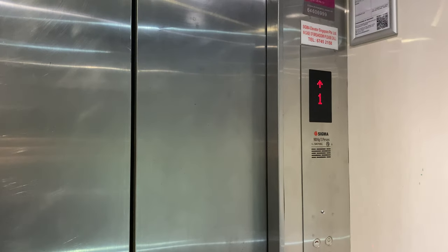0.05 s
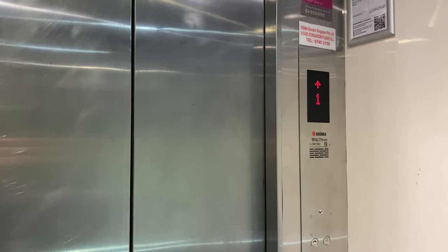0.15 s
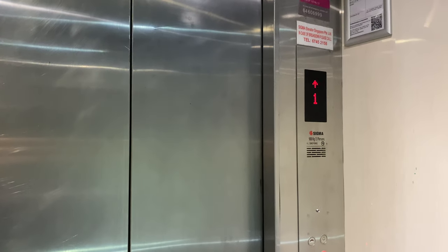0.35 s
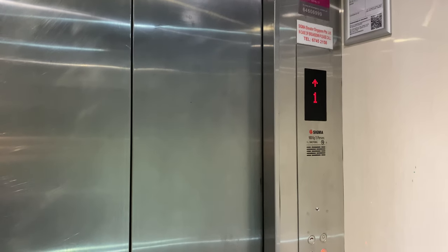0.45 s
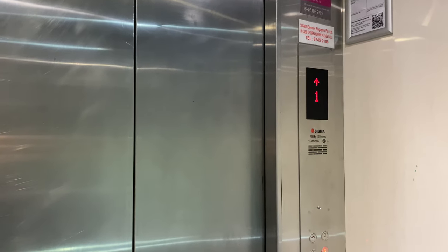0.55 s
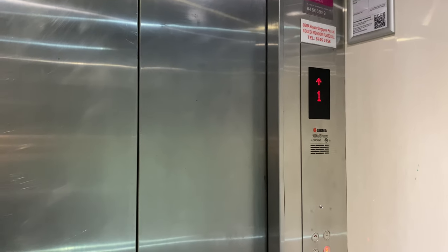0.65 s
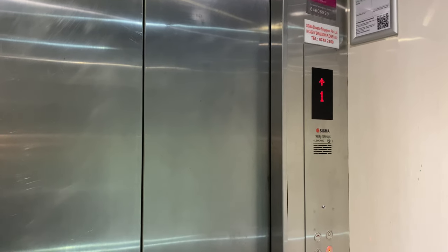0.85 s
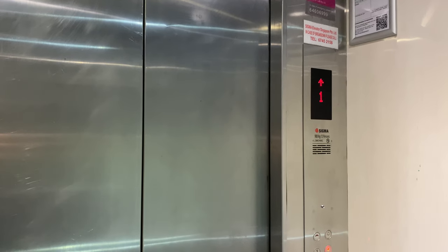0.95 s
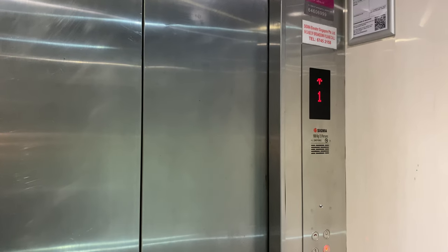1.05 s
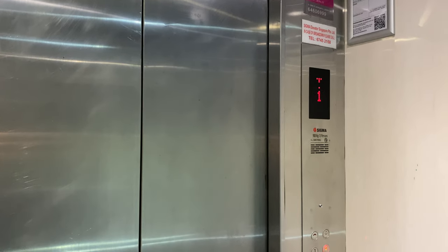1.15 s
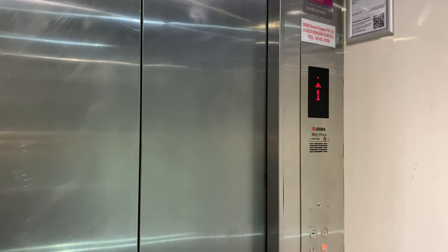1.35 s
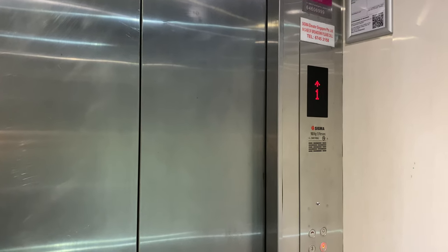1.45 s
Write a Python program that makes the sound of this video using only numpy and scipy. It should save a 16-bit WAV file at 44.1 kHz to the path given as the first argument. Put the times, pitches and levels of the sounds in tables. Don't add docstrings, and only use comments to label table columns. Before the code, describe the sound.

Metal lift doors close with a hard clunk and clang over low machinery hum; loose sheet metal rattles, the frame rings on, then a latch chatters and knocks lightly, heard close up in a small steel space.

```python
import sys
import numpy as np
from scipy import signal
from scipy.fft import rfft, irfft
from scipy.io import wavfile
from scipy.ndimage import uniform_filter1d

SR = 44100
rng = np.random.default_rng(int(sys.argv[2]) if len(sys.argv) > 2 else 0)


def unload_audio(sound):
    columns = np.transpose(np.atleast_2d(sound))
    steps = np.round(np.clip(columns, -1, 1) * 32767)
    wavfile.write(sys.argv[1], SR, steps.astype(np.int16))


def how_loud(loudness_db):
    steps = np.asarray(loudness_db, float) / 20
    return 10 ** steps


N = 66150

# pitch_hz, level_db (per Hz)
HUM_SPECTRUM = [(12, -51), (20, -12), (96, -1), (326, -19.5), (414, -21), (849, -19), (920, -27.5),
                (2530, -38.5), (11500, -60), (15000, -94), (22000, -120)]
# pitch_hz, width_hz, level_db (rms)
DUCT_RESONANCES = [(50.6, 8.3, -53.5), (125, 31, -48.5), (247, 15, -56.5), (382.6, 9.8, -56),
                   (638, 85, -61), (820, 130, -61), (1224, 320, -56.5), (2583, 110, -63.5)]
# time_s, level_db
MACHINE_LOAD = [(0, -2), (.2, -1), (.6, -1.5), (.9, 2.5), (1.0, -3.5), (1.15, -2.5), (1.3, -3.5), (1.5, -3)]
# time_s, centre_hz, level_db
DRIVE_PATH = [(0.901, 13600, -85), (1.03, 13600, -69), (1.151, 14400, -65.5), (1.28, 14200, -66.5),
              (1.4, 14200, -67), (1.5, 13900, -98)]
# start_s, level_db, hold_s, t60_s, tilt_db_per_octave
RATTLES = [(0.213, -39, 0.076, 0.25, 4.5), (0.268, -30.5, 0.05, 0.52, -0.5), (0.31, -59, 1, 2.7, 2.5),
           (0.508, -71.5, 0.025, 1.5, 14.5), (0.683, -38.5, 0.033, 0.11, -2.),
           (0.695, -48, 0.015, 0.57, 5.5), (0.737, -44.5, 0.04, 0.28, 0)]
# pitch_hz, level_db (per Hz)
RATTLE_SPECTRUM = [(590, -4.5), (1000, 2.5), (1240, -3), (2020, -7), (2110, -8), (3020, -12.5), (4010, -17),
                   (6290, -20), (11500, -45.5), (15000, -78), (22000, -120)]
# start_s, level_db, hold_s, t60_s
BANGS = [
    (0.232, -39, 0.05, .2),
    (0.27, -23, 0.1, 0.19),
    (0.402, -30, 0.0081, 0.81),
    (0.694, -37.5, 0.061, 0.27),
]
# pitch_hz, level_db (per Hz)
BANG_SPECTRUM = [(100, 1), (170, -10), (242, -13.5), (318, -3.5), (462, -2), (540, -7), (774, -14),
                 (863, 2.5), (1100, -42), (1430, -47), (2420, -120)]
# start_s, level_db
TICKS = [
    (.128, -35),
    (.4285, -16),
]
# start_s, level_db, contact_ms
WALL_THUDS = [(.224, -28.5, 0.67), (.259, -18, 2.4), (.300, -51, 6), (.345, -22.5, 0.72), (.402, -20, 0.68),
              (.462, -20, 6), (.555, -27.5, 2.8), (.63, -30, 0.67), (1.2, -35, 0.74)]
# pitch_hz, level_db, t60_s
WALL_MODES = [(26.4, -25, 1.6), (71, -38, 0.91), (86.2, 1.5, 0.46), (102.45, -3.5, 0.6), (142, -9, 0.4)]
# start_s, level_db, contact_ms
FRAME_BLOWS = [(.280, -33, .1)]
# pitch_hz, level_db, t60_s
FRAME_MODES = [(869, -4, 3.0), (870.8, -4, 1.1)]
# start_s, level_db, contact_ms
LATCH_BLOWS = [(.686, -40, 0.11), (.693, -44, 0.043), (.705, -40.5, 0.041), (.728, -43.5, 0.048)]
# pitch_hz, level_db, t60_s
LATCH_MODES = [(762, -4, 0.19), (1040, -12, 0.19), (1157, 0.5, .15), (1250, -1, 0.13), (1344, 3, 0.095),
               (1430, -2, 0.085), (1694, -1, 0.056), (1880, -14, 0.085)]
# start_s, level_db, contact_ms
LOCK_BLOWS = [(.7035, -25, 1.5), (.7115, -23, 1.3), (.727, -25, 1.2), (.744, -29.5, 0.93)]
# pitch_hz, level_db, t60_s
LOCK_MODES = [(55.6, -4, 0.21), (80, -11, 0.44), (129.6, 0.5, 0.2), (247, -23.5, 0.45), (424, -15, 0.15)]
# start_s, level_db, contact_ms
EDGE_BLOWS = [
    (.2245, -41, 0.95),
    (.2695, -19.5, 0.1),
]
# pitch_hz, level_db, t60_s
EDGE_MODES = [(274, -4, 0.11), (489, -4, .2), (570, -16, 0.043), (720, -1.5, 0.11), (1070, -10, 0.035)]
# start_s, level_db, contact_ms
SKIN_BLOWS = [(.276, -20.5, 0.11), (.290, -16.5, 0.11), (.311, -18, 0.31), (.338, -27.5, 0.091)]
# pitch_hz, level_db, t60_s
SKIN_MODES = [(870, -0.5, 0.19), (902, -3, 0.25), (904, -15, 0.31)]
# start_s, level_db, contact_ms
PANEL_BLOWS = [(.274, -22, 0.44), (.281, -24.5, 0.42), (.289, -25.5, 0.39), (.308, -26.5, 0.33),
               (.330, -26.5, 0.71), (.348, -46, 1.9), (.362, -33.5, 2.4), (.402, -35.5, 1.4)]
PANEL_HZ = [235, 261, 338, 386, 455, 485, 546, 583, 657, 737]
# level_db, t60_s
PANEL_RINGS = [(-6.5, 0.47), (-3.5, 0.753), (-5.5, 0.36), (-0.5, 0.23), (-1.5, 0.26), (-1.5, 0.66),
               (-5.5, 0.75), (-6, 0.28), (-12, 0.11), (-12, 0.11)]

HUM_DB, SWELL_DB, FLICKER_DB = -39.5, 0.7, 1.5
LOAD_HZ = 200
DRIVE_WIDTH_HZ = 900
AIR_HZ, AIR_WIDTH_HZ, AIR_DB, AIR_RATTLE_DB = 12900, 6600, -80.5, -33.5
RATTLE_ATTACK_S, RATTLE_GRAIN_DB = 0.003, 0.5
TICK_HZ, TICK_S = 2600, 0.00006
CAR_T60_S, CAR_DB = 0.14, -9.5
DOOR_PAN_DB = 3.5
WIDE_HZ, WIDE_SLOPE = 1290, 0.48
NOTCH_HZ, NOTCH_WIDTH_HZ, NOTCH_DB = 12120, 490, -44
PORT_LOW_HZ, PORT_TOP_HZ = 22.5, 15350
T = np.arange(N) / SR
F = np.maximum(np.fft.rfftfreq(N, 1 / SR), 1)


def unit(x):
    return x / np.sqrt(np.mean(x ** 2))


def shape(x, db):
    return irfft(rfft(x) * how_loud(db), N)


def spectrum(points):
    hz, db = np.array(points).T
    return np.interp(np.log(F), np.log(hz), db)


def bump(hz, width_hz):
    return -20 * np.log10(1 + (2 * (F - hz) / width_hz) ** 2)


def wide(hz):
    return np.minimum(hz / WIDE_HZ, 1) ** WIDE_SLOPE


def noise():
    mid, side = rng.standard_normal((2, N))
    side = irfft(rfft(side) * wide(F), N)
    return np.array([mid + side, mid - side])


def walk(rate_hz):
    hold = int(SR / rate_hz)
    steps = np.repeat(rng.standard_normal(N // hold + 1), hold)
    return 2.36 * uniform_filter1d(uniform_filter1d(steps, hold), hold)[:N]


def envelope(start_s, level_db, hold_s, t60_s):
    t = np.maximum(T - start_s, 0)
    release_db = 60 * np.maximum(t - hold_s, 0) / t60_s
    return np.minimum(t / RATTLE_ATTACK_S, 1) * how_loud(level_db - release_db)


def struck(blows, modes, scatter_db, spin):
    out = np.zeros((2, N))
    apart = rng.uniform(-0.039, 1, len(modes))
    luck = rng.standard_normal((len(blows), len(modes), 2))
    fade = np.arange(1024) / SR
    sides = np.array([[1], [-1]])
    for k, (hz, db, t60_s) in enumerate(modes):
        push = np.zeros(N + 1024, complex)
        for (start_s, level_db, contact_ms), (size, turn) in zip(blows, luck[:, k]):
            blow = np.exp(-fade * 1000 / max(contact_ms, .03))
            gain = how_loud(level_db + db + scatter_db * size) * np.exp(1j * spin * turn)
            i = int(start_s * SR)
            push[i:i + 1024] += blow / blow.sum() * gain
        pole = np.exp(2j * np.pi * hz / SR - np.log(1000) / (t60_s * SR))
        ring = signal.lfilter([1], [1, -pole], push[:N])
        out += (ring * np.exp(1j * wide(hz) * apart[k] * sides)).imag
    return out


def thin_air(sound):
    return unit(shape(sound, bump(AIR_HZ, AIR_WIDTH_HZ)))


def hum():
    bands, duct = 0, 0
    swell = SWELL_DB * walk(0.53)
    load = np.interp(T, *np.array(MACHINE_LOAD).T)
    for hz in 30 * 2. ** np.arange(9):
        band = shape(noise(), spectrum(HUM_SPECTRUM) - 12 * np.log2(F / hz) ** 2)
        bands = bands + band * how_loud(swell + FLICKER_DB * walk(8.39) + load / (1 + hz / LOAD_HZ))
    for hz, width_hz, db in DUCT_RESONANCES:
        level_db = db + FLICKER_DB * walk(12.2) + load / (1 + hz / LOAD_HZ)
        duct = duct + how_loud(level_db) * unit(shape(noise(), bump(hz, width_hz)))
    return how_loud(HUM_DB) * unit(bands) + duct + how_loud(AIR_DB) * thin_air(noise())


def drive():
    time_s, centre_hz, level_db = np.array(DRIVE_PATH).T
    slow = unit(shape(rng.standard_normal((2, N)), bump(0, DRIVE_WIDTH_HZ)))
    carrier = np.sin(2 * np.pi * np.cumsum(np.interp(T, time_s, centre_hz)) / SR)
    return slow * carrier * how_loud(np.interp(T, time_s, level_db))


def walls():
    return struck(WALL_THUDS, WALL_MODES, 0.87, 0.42)


def rattles():
    grains = noise() * how_loud(RATTLE_GRAIN_DB * walk(700))
    air = thin_air(grains)
    out = 0
    for start_s, level_db, hold_s, t60_s, tilt in RATTLES:
        body = unit(shape(grains, spectrum(RATTLE_SPECTRUM) + tilt * np.log2(F / 2000)))
        metal = body + how_loud(AIR_RATTLE_DB + 2.5 * tilt) * air
        out = out + envelope(start_s, level_db, hold_s, t60_s) * metal
    return out


def bangs():
    return sum(envelope(*row) for row in BANGS) * unit(shape(noise(), spectrum(BANG_SPECTRUM)))


def ticks():
    out = 0
    for start_s, level_db in TICKS:
        t = np.maximum(T - start_s, 0)
        out = out + how_loud(level_db) * np.sin(2 * np.pi * TICK_HZ * t) * np.exp(-t / TICK_S)
    return out


def latch():
    return struck(LATCH_BLOWS, LATCH_MODES, 3.7, 2.27)


def lock():
    return struck(LOCK_BLOWS, LOCK_MODES, 0.95, 0.097)


def frame():
    return struck(FRAME_BLOWS, FRAME_MODES, 0, 0)


def doors():
    panel_modes = [(hz, *ring) for hz, ring in zip(PANEL_HZ, PANEL_RINGS)]
    panels = struck(PANEL_BLOWS, panel_modes, 2.5, 1.5)
    edges = struck(EDGE_BLOWS, EDGE_MODES, 0.84, 0.58)
    skin = struck(SKIN_BLOWS, SKIN_MODES, 0.79, 0.14)
    return panels + edges + skin


def car_echo(sound):
    tail = noise()[:, :SR // 2] * how_loud(-60 * T[:SR // 2] / CAR_T60_S)
    tail = tail / np.sqrt((tail ** 2).sum(axis=1, keepdims=True))
    return signal.fftconvolve(sound, tail, axes=1)[:, :N]


def scene():
    sharp = doors() + latch() + lock()
    echo = how_loud(CAR_DB) * car_echo(sharp)
    direct = sharp * how_loud(np.array([[.5], [-.5]]) * DOOR_PAN_DB)
    return hum() + drive() + walls() + rattles() + bangs() + ticks() + frame() + echo + direct


def low_pass(x):
    return signal.sosfilt(signal.butter(12, 15810, fs=SR, output="sos"), x)


def record(dry):
    hz = np.maximum(np.fft.rfftfreq(2 * N, 1 / SR), 1)
    notch = NOTCH_DB * np.exp(-((hz - NOTCH_HZ) / NOTCH_WIDTH_HZ) ** 2)
    low_cut = -10 * np.log10(1 + (PORT_LOW_HZ / hz) ** 4)
    top_cut = -np.maximum(hz - PORT_TOP_HZ, 0) / 25
    mirrored = np.hstack([dry, dry[:, ::-1]])
    mix = irfft(rfft(mirrored) * how_loud(notch + low_cut + top_cut))[:, :N]
    return low_pass(mix)


dry = scene()
out = record(dry)
unload_audio(out)
```